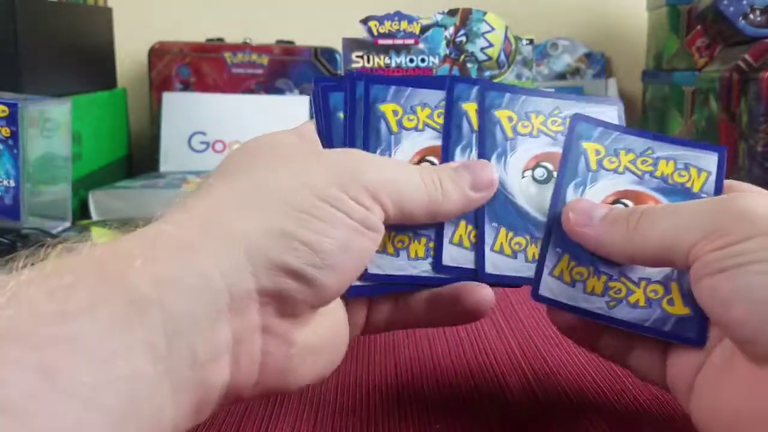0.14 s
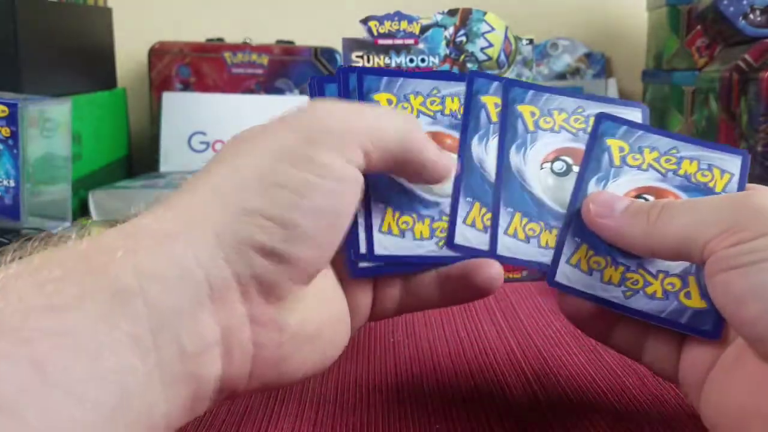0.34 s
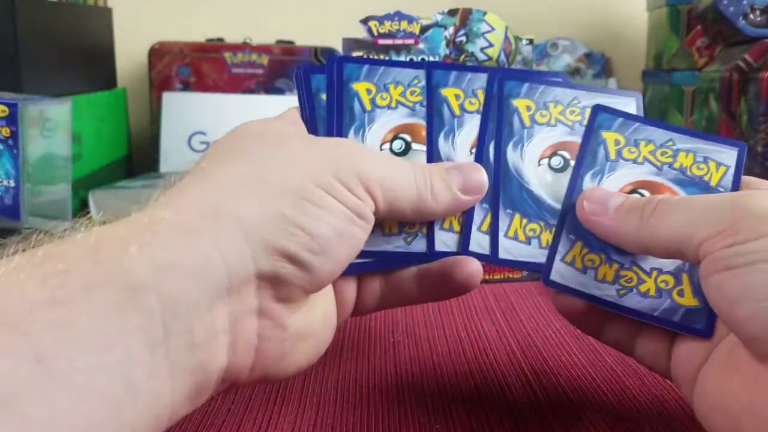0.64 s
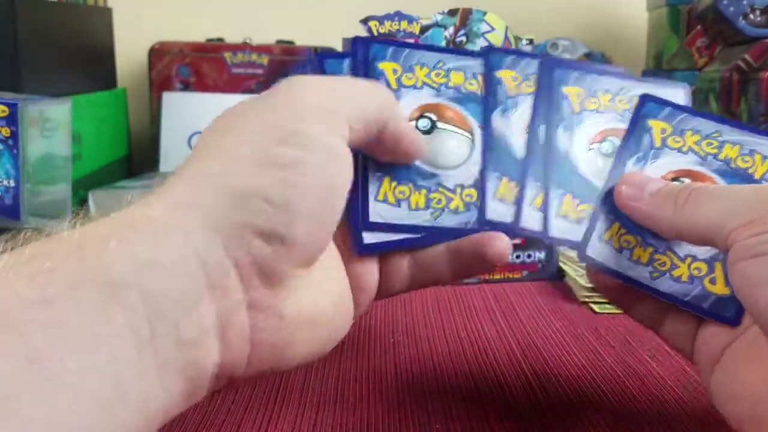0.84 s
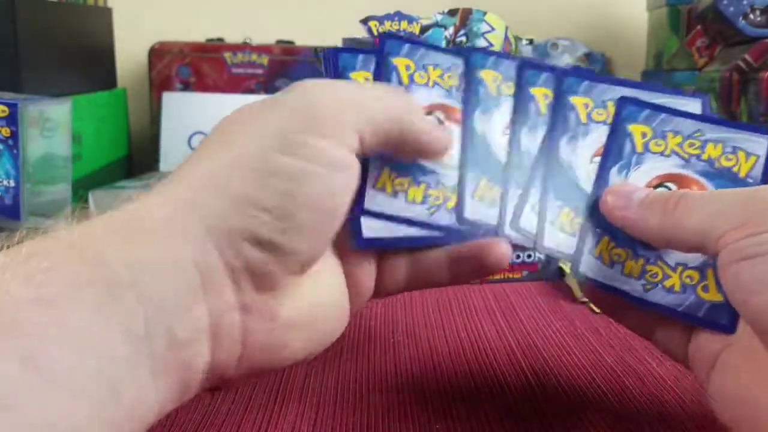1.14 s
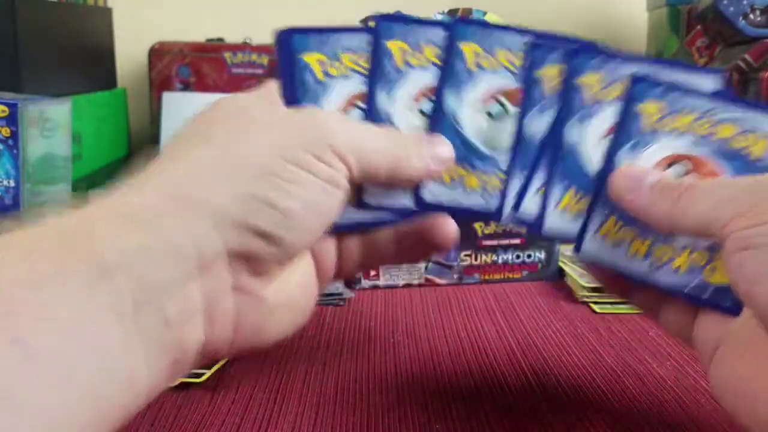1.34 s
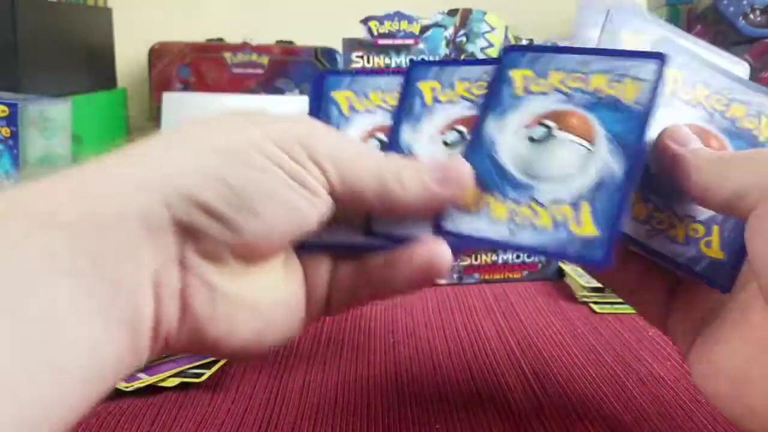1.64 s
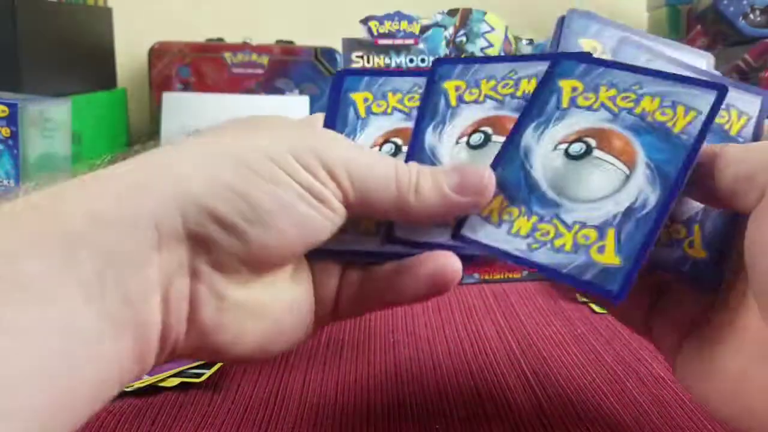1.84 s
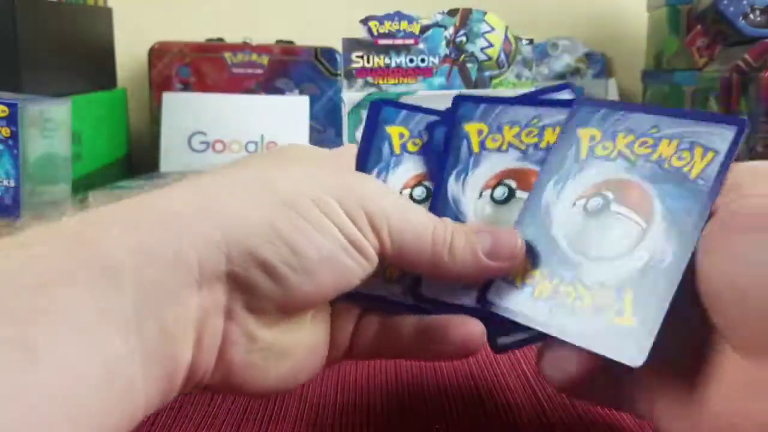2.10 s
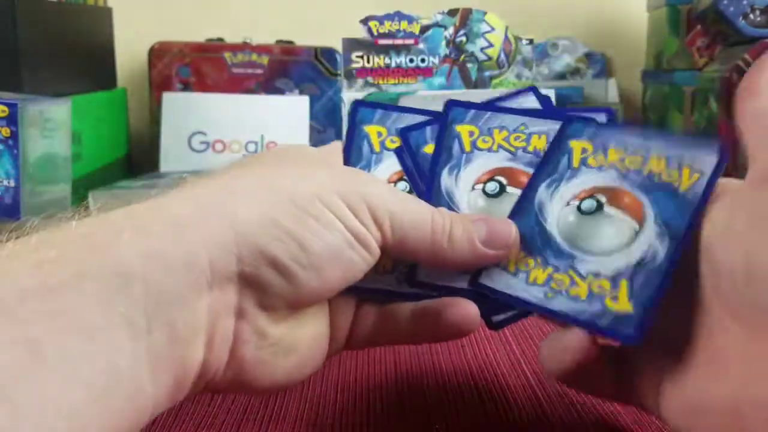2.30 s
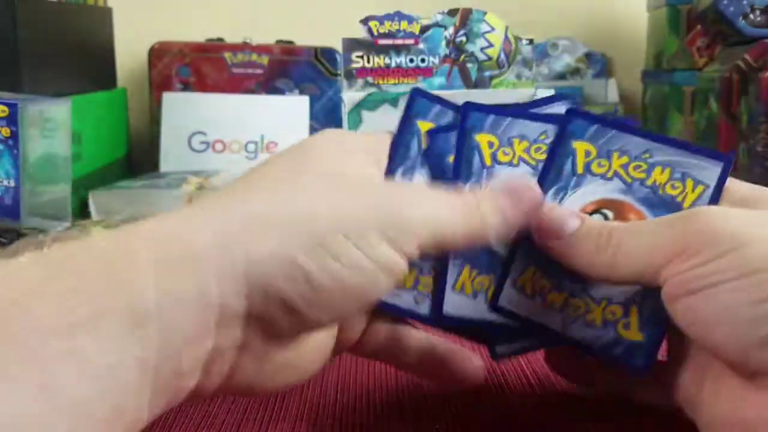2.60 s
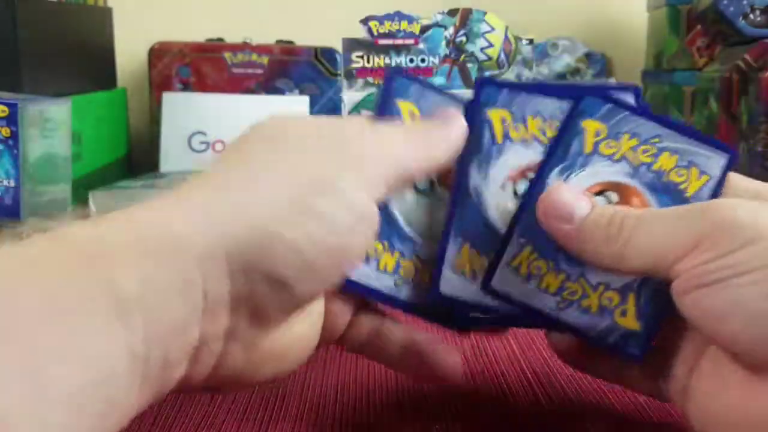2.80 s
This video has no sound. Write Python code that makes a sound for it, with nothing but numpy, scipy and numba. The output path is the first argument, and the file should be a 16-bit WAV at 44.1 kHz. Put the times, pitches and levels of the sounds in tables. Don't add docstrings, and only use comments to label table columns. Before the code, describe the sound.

Glossy trading cards slide and snap between two hands, close up, over a low room rumble

```python
import sys
import numpy as np
from scipy import signal
from scipy.fft import rfft, irfft, next_fast_len
from scipy.io import wavfile
from scipy.ndimage import uniform_filter1d, map_coordinates
from numba import njit

SR = 44100
rng = np.random.default_rng(int(sys.argv[2]) if len(sys.argv) > 2 else 0)


def unload_wav(signal):
    wavfile.write(
        sys.argv[1],
        SR,
        np.round(np.clip(np.atleast_2d(signal).T, -1, 1) * 32767).astype(np.int16),
    )


def voltage_ratio(level):
    return 10 ** (np.asarray(level, float) / 20)


N = 130095

# peak in seconds, rise in seconds, fall in seconds, hiss in dB, body in dB.
SLIDES = [(.0, 0.0081, 0.067, -72, -66), (.072, 0.018, 0.015, -54.5, -60.5), (0.099, 0.02, 0.026, -53, -60),
          (.14, 0.0087, 0.023, -66, -68), (0.639, 0.031, 0.037, -55, -66.5),
          (.71, 0.018, 0.03, -65.5, -71.5), (.96, 0.029, 0.015, -71, -67.5),
          (1.028, 0.025, 0.031, -51, -66.5), (1.07, 0.021, 0.014, -69, -64.5),
          (1.105, 0.025, 0.02, -65, -66), (1.318, 0.021, 0.013, -58, -64.5),
          (1.342, .012, 0.039, -63.5, -66.5), (1.455, 0.025, 0.025, -55, -63.5),
          (1.49, 0.029, 0.042, -55.5, -62), (1.72, 0.0081, 0.0088, -67.5, -75),
          (1.808, 0.011, 0.017, -52, -52), (1.861, 0.099, 0.067, -68.5, -62),
          (2.025, 0.04, 0.029, -59, -58), (2.09, 0.048, 0.074, -51, -52), (2.16, 0.0065, 0.039, -52, -51.5),
          (2.225, 0.017, 0.033, -67, -58), (2.295, 0.014, 0.016, -62, -57),
          (2.308, 0.0042, 0.0057, -52, -50.5), (2.35, 0.057, 0.03, -63, -65),
          (2.416, 0.011, 0.018, -63, -55), (2.434, 0.0025, 0.011, -58, -53.5),
          (2.599, 0.034, 0.032, -58, -59), (2.67, 0.025, 0.02, -60.5, -57.5),
          (2.725, 0.017, 0.027, -59.5, -61.5), (2.77, 0.018, 0.03, -64, -65.5),
          (2.806, 0.015, 0.013, -63, -68), (2.95, 0.029, .02, -58, -64.5)]
# frequency in Hz, level in dB.
HISS_COLOUR = [(700, -39), (2000, -4), (5000, -1.5), (8000, 4), (10000, 7.5), (13000, 17.5), (16000, -5.5)]
# centre in Hz, width in Hz, level in dB.
PANEL_TONES = [(1530, 860, 11.5), (2400, 1370, 14), (3350, 1900, 10), (4560, 3450, 9.5), (5800, 1300, -3)]
# peak in seconds, rise in seconds, fall in seconds, level in dB,
# panel tone in Hz.
SCUFFS = [(1.809, .006, .006, -55, 10600), (1.86, .089, .11, -70, 3100), (2.09, .06, .064, -60, 3900),
          (2.165, .01, .025, -58, 4000), (2.301, .018, .0095, -56, 1650), (2.407, .003, .002, -53, 2100),
          (2.41, .002, .002, -49, 1500), (2.411, .0099, .012, -53, 13500), (2.416, .0028, .003, -49, 2400),
          (2.4175, .002, .002, -50, 1400), (2.427, .0015, .002, -54, 2180), (2.434, .001, .007, -48.5, 940),
          (2.435, .0015, .004, -52, 2830), (2.443, .003, .006, -58, 2200), (2.599, .003, .005, -53, 1470),
          (2.602, .003, .004, -56, 2020), (2.61, .013, .013, -62, 4160), (2.667, .001, .008, -49, 1750),
          (2.671, .004, .006, -50, 1200), (2.677, .003, .004, -53, 2300), (2.7264, .0035, .0024, -47, 2850),
          (2.727, .005, .0024, -48, 975)]
# start in seconds, length in seconds, level in dB,
# first tone in Hz, last tone in Hz.
DRAGS = [
    (.41, 0.1, -73, 1310, 1380),
    (0.428, .1, -75, 3700, 3600),
    (2.003, 0.088, -63, 3300, 3650),
    (2.038, 0.13, -62.5, 3700, 4300),
    (2.038, 0.04, -62.5, 2540, 2400),
    (2.06, 0.043, -66, 9200, 9700),
    (2.575, 0.064, -70, 4160, 4430),
    (2.687, 0.027, -63.5, 2560, 2950),
    (2.745, 0.049, -71, 8800, 8800),
]
# start in seconds, ring in dB, ring in Hz, ring T60 in seconds, crack in dB.
SNAPS = [(.3655, -41, 444, 0.012, -43.5), (0.401, -45, 2700, .012, -54), (.403, -49, 3300, .02, -70),
         (1.194, -45.5, 1600, 0.014, -69), (1.3405, -46, 500, 0.025, -60), (1.340, -45.5, 1050, 0.017, -45),
         (1.5325, -53, 910, 0.024, -45), (1.5349, -35.5, 428, 0.024, -56), (1.535, -45, 1227, 0.024, -58),
         (1.5374, -42, 920, 0.029, -60), (1.738, -48, 1480, 0.025, -41), (1.7473, -32.5, 900, 0.036, -34),
         (1.7475, -38.5, 537, 0.02, -56), (1.7495, -48, 1450, .02, -60), (1.768, -41, 1440, .012, -60),
         (1.7482, -40, 2070, 0.018, -45), (1.773, -45, 4270, .006, -30),
         (1.7975, -31.5, 1180, 0.0062, -26.5), (1.797, -35, 3800, 0.0095, -46),
         (1.7975, -41, 1020, 0.015, -42), (1.798, -35.5, 1430, .012, -60), (2.564, -45.5, 940, 0.012, -40),
         (2.639, -38, 1640, 0.0098, -46), (2.640, -40, 2500, .01, -58)]
# frequency in Hz, level in dB.
CRACK_COLOUR = [(400, -72), (1200, 4.5), (4500, 8), (6000, -20), (9000, -8), (13500, -18), (16000, -4)]
# start in seconds, level in dB, centre in Hz, T60 in seconds.
TICKS = [(1.282, -54, 12600, .004), (1.5325, -44.5, 2860, 0.0034), (1.341, -47, 2600, 0.0061),
         (.3655, -61, 7000, .004), (.3655, -50, 1980, 0.0054), (1.7732, -35.5, 13100, 0.0035),
         (1.7732, -40, 3800, 0.0042), (1.7975, -31, 13000, 0.0061), (1.7975, -39, 7900, 0.0033),
         (1.7481, -36.5, 3260, 0.0056), (2.007, -47, 3300, .006), (2.155, -41, 2980, .01),
         (2.4332, -45, 9500, 0.0054), (2.4365, -48.5, 7600, .006), (2.4341, -41.5, 3020, 0.005),
         (2.437, -47, 4000, 0.0045), (2.564, -56, 6000, .004), (2.640, -55, 6500, .004),
         (2.666, -49, 4000, 0.011), (2.676, -53, 3500, .008), (2.725, -50, 7500, .008),
         (2.735, -59, 4300, .005), (2.824, -55, 2500, 0.0034)]
# frequency in Hz, level in dB.
LEFT_PORT = [(300, 1.5), (1000, 5.5), (4000, 4.5), (8000, 5), (9600, 10.5), (11000, 4), (12200, 1),
             (14600, -1.5)]
RIGHT_PORT = [(300, 13), (1000, 0.5), (4000, 1.5), (5300, -2), (10000, -2), (12800, -2.5), (14600, 6.5)]
# frequency in Hz, level in dB per Hz.
RUMBLE_COLOUR = [(25, -24), (60, -14), (200, -12), (300, -16.5), (360, -28), (560, -33), (800, -54),
                 (2000, -60.5)]
# frequency in Hz, level in dB per Hz.
VENT_COLOUR = [(500, -0.5), (800, 0), (1300, 0.5), (2000, -3.5), (4000, -11.5), (6000, -18.5),
               (8500, -27.5), (13000, -17.5)]
# frequency in Hz, left minus right in dB.
AIR_PAN = [(60, -.5), (200, 1.1), (400, 4), (1300, 3.5), (2400, 2), (4400, -1.5), (15000, 1)]
# centre in Hz, width in Hz, level in dB.
ROOM_MODES = [(67.6, 2.04, -50.5), (85, 22, -66), (107.4, 6.1, -55), (132.5, 7.3, -49.5),
              (144.5, 2.54, -49), (172.83, 9.4, -42.5), (205.1, 3.8, -67.5), (217.2, 3.4, -57),
              (237.4, 5.1, -50.5), (281.7, 43.5, -55.5)]

GRAIN_DB, PORT_SHARE = 3.6, 0.49
FLUTTER_DB, FLUTTER_HZ, PANEL_DRIFT_RATIO = 1.3, 70, .04
DRAG_WIDTH_RATIO, DRAG_ROUGH_DB = .09, 1.5
OVERTONE_RATIO, OVERTONE_DB, BOUNCE_S, BOUNCE_DB = 1.55, -10, .0017, -13
MAX_RING_CYCLES, PORT_TURN_RAD, PORT_LAG_S = 36, .7, 0.000082
ROOM_T60_S, ROOM_DB, ROOM_DULL_HZ = .2, -16, 5000
RUMBLE_DB, VENT_DB, MODE_SWELL_DB, MODE_SIDE_DB = -44.5, -61, 2, -16
TWIST_RAD, ALIKE_HZ = .18, 500
TOP_HZ, OFFSET = 14480, -.0006


def curve(table, hz):
    table_hz, table_db = np.array(table).T
    return np.interp(np.log(hz + 1), np.log(table_hz), table_db)


def colour(x, table):
    n = 2 * next_fast_len(x.shape[-1] // 2 + 4096)
    hz = np.arange(n // 2 + 1) * SR / n
    cepstrum = irfft(np.log(voltage_ratio(curve(table, hz))), n)
    cepstrum[1:n // 2] *= 2
    cepstrum[n // 2 + 1:] = 0
    response = np.exp(rfft(cepstrum))
    return irfft(rfft(x, n) * response, n)[..., :x.shape[-1]]


def unit(x):
    return x / np.sqrt(np.mean(x ** 2))


def decay(t, t60_s):
    return np.exp(-np.log(1000) * t / t60_s)


@njit
def svf(x, hz, width_hz):
    y, band, low = np.empty(len(x)), 0., 0.
    for i in range(len(x)):
        g, k = np.tan(np.pi * hz[i] / SR), width_hz / hz[i]
        v = (band + g * (x[i] - low)) / (1 + g * (g + k))
        band, low, y[i] = 2 * v - band, low + 2 * g * v, k * v
    return y


def panel(ports, centre_hz, width_hz):
    return np.array([svf(svf(x, centre_hz, width_hz), centre_hz, 2 * width_hz) for x in ports])


def walk(rate_hz):
    k = int(SR / rate_hz)
    steps = np.repeat(rng.standard_normal(N // k + 1), k)
    return unit(uniform_filter1d(uniform_filter1d(steps, k), k)[:N])


def swell(peak_s, rise_s, fall_s):
    t = np.arange(N) / SR - peak_s
    return np.exp(-np.where(t < 0, (t / rise_s) ** 2, np.abs(t / fall_s) ** np.sqrt(2)))


def grains():
    size_db = GRAIN_DB * np.minimum(rng.exponential(size=N), 4)
    return rng.standard_normal(N) * voltage_ratio(size_db)


def grit():
    shared = grains()
    return np.array([PORT_SHARE * shared + np.sqrt(1 - PORT_SHARE ** 2) * grains() for _ in range(2)])


def slides():
    hiss = unit(colour(grit(), HISS_COLOUR)) * voltage_ratio(FLUTTER_DB * walk(FLUTTER_HZ))
    slips, body = grit(), np.zeros((2, N))
    for hz, width_hz, db in PANEL_TONES:
        centre_hz = hz * (1 + PANEL_DRIFT_RATIO * walk(15))
        flutter = voltage_ratio(db + FLUTTER_DB * walk(FLUTTER_HZ / 2))
        body += flutter * unit(panel(slips, centre_hz, float(width_hz)))
    hiss_power, body_power = np.zeros(N), np.zeros(N)
    for peak_s, rise_s, fall_s, hiss_db, body_db in SLIDES:
        bell = swell(peak_s, rise_s, fall_s)
        hiss_power += (voltage_ratio(hiss_db) * bell) ** 2
        body_power += (voltage_ratio(body_db) * bell) ** 2
    return hiss * np.sqrt(hiss_power) + unit(body) * np.sqrt(body_power)


def scuffs():
    out, slips = np.zeros((2, N)), grit() * voltage_ratio(2.2 * walk(400))
    for peak_s, rise_s, fall_s, db, hz in SCUFFS:
        a, b = max(int((peak_s - .13) * SR), 0), int((peak_s + .13) * SR)
        centre_hz = hz * (1 + 0.02 * walk(24.8)[a:b])
        tone = np.array([svf(svf(x[a:b], centre_hz, hz * .22), centre_hz, hz * .45) for x in slips])
        bell = swell(peak_s, rise_s, fall_s)[a:b]
        out[:, a:b] += voltage_ratio(db) * unit(tone * bell) * np.sqrt(np.mean(bell ** 2))
    return out


def drags():
    out, slips = np.zeros((2, N)), grit() * voltage_ratio(DRAG_ROUGH_DB * walk(150))
    for start_s, length_s, db, from_hz, to_hz in DRAGS:
        a, n = int(start_s * SR), int(length_s * SR)
        tone = panel(slips[:, a:a + n], np.linspace(from_hz, to_hz, n), from_hz * DRAG_WIDTH_RATIO)
        out[:, a:a + n] += voltage_ratio(db) * unit(tone * np.sqrt(np.hanning(n)))
    return out


def snaps():
    rings, cracks, t = np.zeros((2, N + SR)), np.zeros((2, N + SR)), np.arange(SR // 12) / SR
    for start_s, ring_db, hz, t60_s, crack_db in SNAPS:
        noise = rng.standard_normal((3, len(t)))
        fade = decay(t, min(t60_s, MAX_RING_CYCLES / hz))
        turn_rad = np.array([[0], [PORT_TURN_RAD * min(hz / 900, 2)]])
        phase = 2 * np.pi * hz * t + turn_rad
        overtone = voltage_ratio(OVERTONE_DB) * np.sin(phase * OVERTONE_RATIO) * fade
        onset = np.minimum(t * hz * 4, 1)
        rough = voltage_ratio(unit(uniform_filter1d(noise[2], size=60)))
        ring = voltage_ratio(ring_db) * (np.sin(phase) + overtone) * onset * fade * rough
        for lag_s, gain in ((0, 1), (BOUNCE_S, voltage_ratio(BOUNCE_DB))):
            i = int((start_s + lag_s) * SR)
            rings[:, i:i + len(t)] += gain * ring
        i = int(start_s * SR)
        rattle = np.diff(noise[:2], prepend=0) * (0.41 * decay(t, 0.0044) + 0.13 * decay(t, 0.051))
        cracks[:, i:i + len(t)] += voltage_ratio(crack_db) * (rattle - (t == 0))
    left, right = rings[:, :N] + colour(cracks[:, :N], CRACK_COLOUR)
    late_left = map_coordinates(left, [np.arange(N) - PORT_LAG_S * SR], order=3)
    return np.array([late_left, right])


def ticks():
    out, t = np.zeros((2, N)), np.arange(SR // 40) / SR
    for start_s, db, hz, t60_s in TICKS:
        noise = rng.standard_normal((3, len(t)))
        burst = (noise[:2] + noise[2]) * decay(t, t60_s)
        hit = panel(burst, hz + 0 * t, hz / 2)
        i = int(start_s * SR)
        out[:, i:i + len(t)] += voltage_ratio(db) * hit / np.abs(hit).max()
    return out


def room(cards):
    t = np.arange(SR // 2) / SR
    tail = rng.standard_normal((2, len(t))) * decay(t, ROOM_T60_S) * (t > .003)
    tail = colour(tail, [(ROOM_DULL_HZ / 4, 0), (ROOM_DULL_HZ * 2, -8)])
    tail = tail / np.sqrt(np.sum(tail ** 2, axis=1, keepdims=True))
    return voltage_ratio(ROOM_DB) * signal.fftconvolve(cards, tail, axes=1)[:, :N]


def noise_spectra():
    return rfft(rng.standard_normal((2, N)))


def ventilation():
    hz = np.arange(N // 2 + 1) * SR / N
    sign = np.array([[1], [-1]])
    ports = voltage_ratio(sign * curve(AIR_PAN, hz) / 2) * np.exp(1j * sign * TWIST_RAD)
    mid, side = noise_spectra()
    apart = 1 / (1 + (ALIKE_HZ / (hz + 1)) ** 4)
    rumble = (mid * np.sqrt(2 - apart) + sign * side * np.sqrt(apart)) * voltage_ratio(curve(RUMBLE_COLOUR, hz))
    hiss = noise_spectra() * voltage_ratio(curve(VENT_COLOUR, hz))
    out = unit(irfft(rumble * ports, N)) * voltage_ratio(RUMBLE_DB + 0.14 * walk(3.9))
    out += unit(irfft(hiss * ports, N)) * voltage_ratio(VENT_DB + 0.8 * walk(4.0))
    for centre_hz, width_hz, db in ROOM_MODES:
        offset = (hz - centre_hz) / width_hz
        mid, side = noise_spectra() / (1 + 2j * offset) / (1 + (offset / 10) ** 2)
        mode = (mid + sign * voltage_ratio(MODE_SIDE_DB) * side) * ports
        out += voltage_ratio(db + MODE_SWELL_DB * walk(3.09)) * unit(irfft(mode, N))
    return out


def scene():
    cards = slides() + scuffs() + drags() + snaps() + ticks()
    left, right = cards + room(cards)
    return np.array([colour(left, LEFT_PORT), colour(right, RIGHT_PORT)]) + ventilation()


def band_limit(x):
    return signal.sosfilt(signal.butter(12, 15460, fs=SR, output="sos"), x)


def record(dry):
    low_pass = signal.ellip(12, .3, 28, TOP_HZ, fs=SR, output="sos")
    mix = signal.sosfilt(low_pass, dry) + OFFSET
    return band_limit(mix)


dry = scene()
out = record(dry)
unload_wav(out)
```